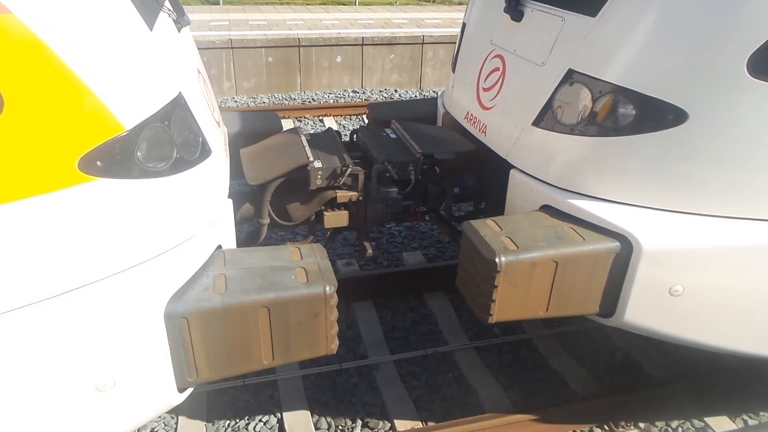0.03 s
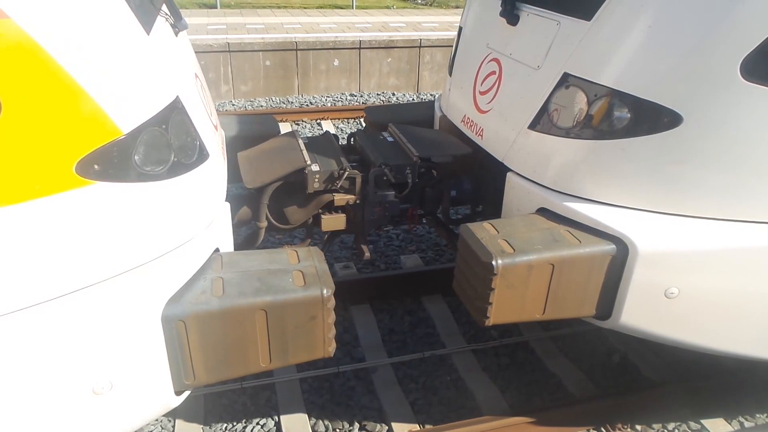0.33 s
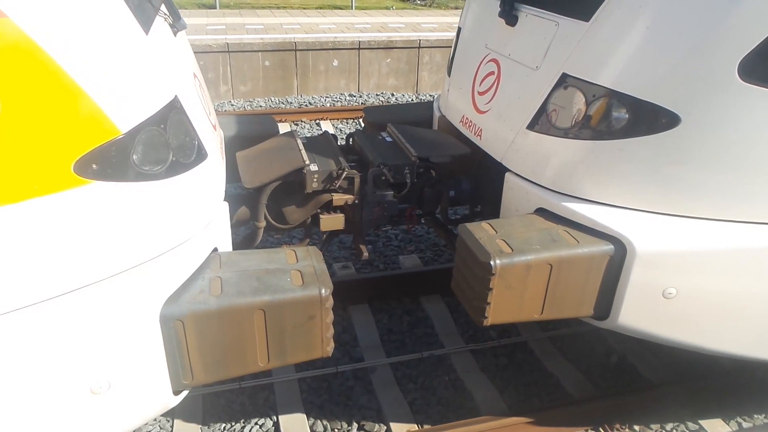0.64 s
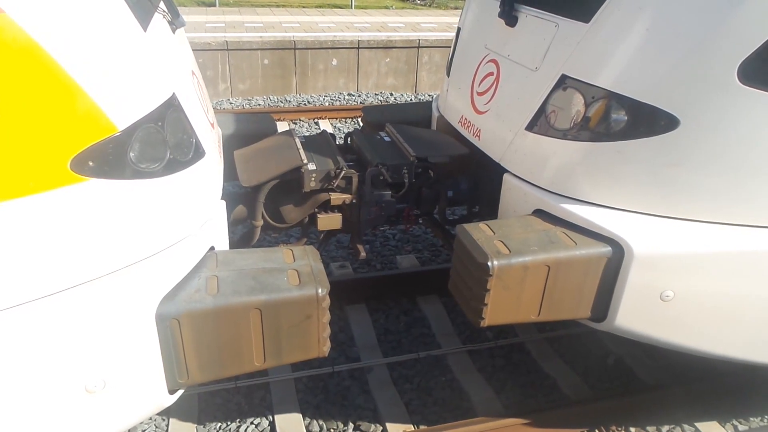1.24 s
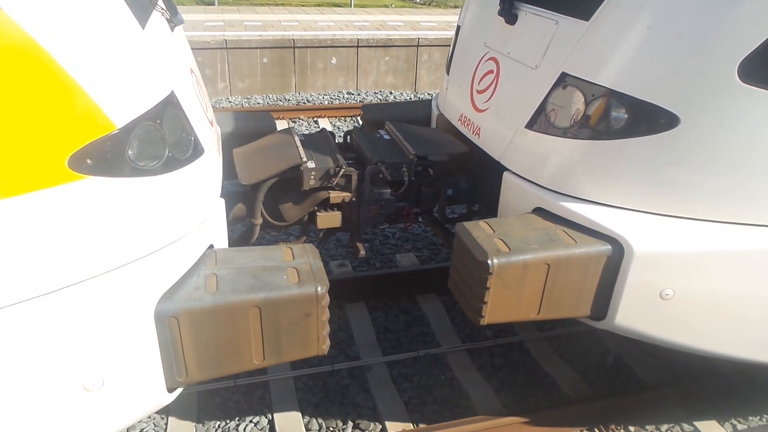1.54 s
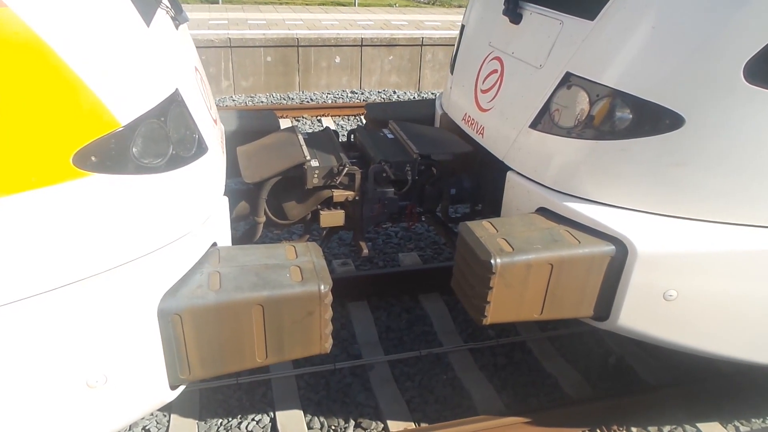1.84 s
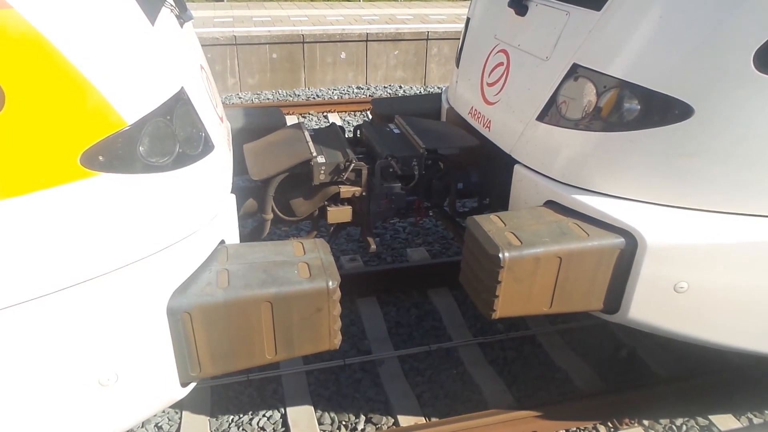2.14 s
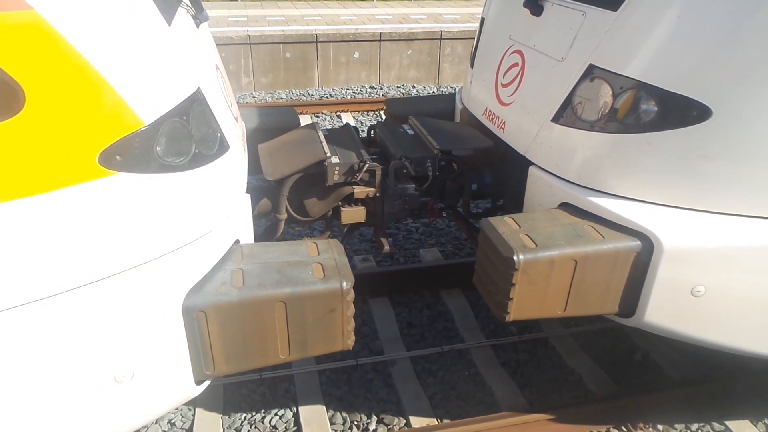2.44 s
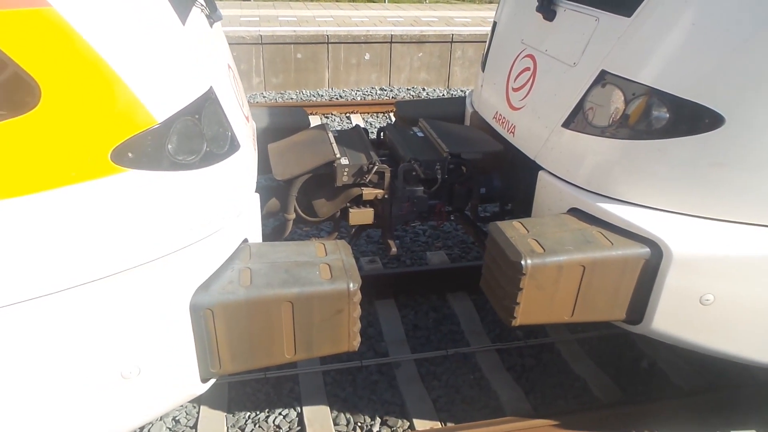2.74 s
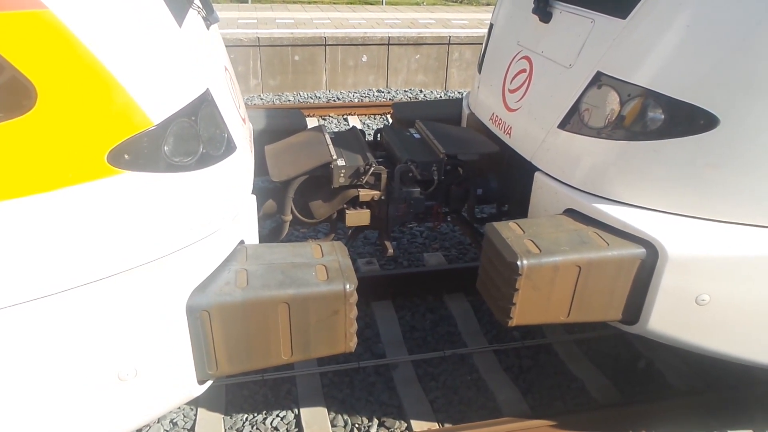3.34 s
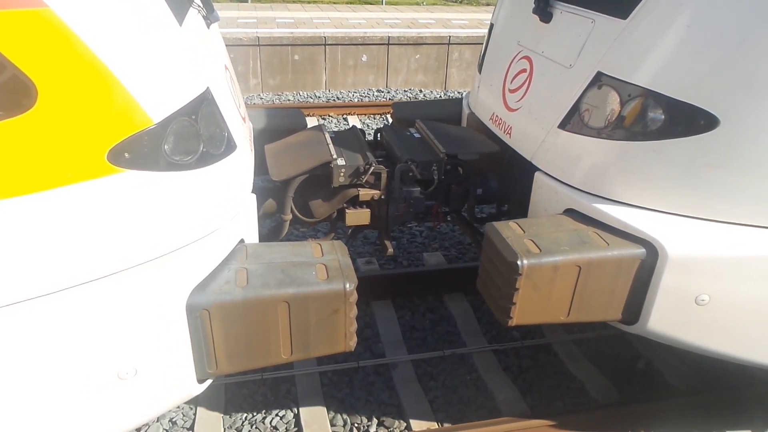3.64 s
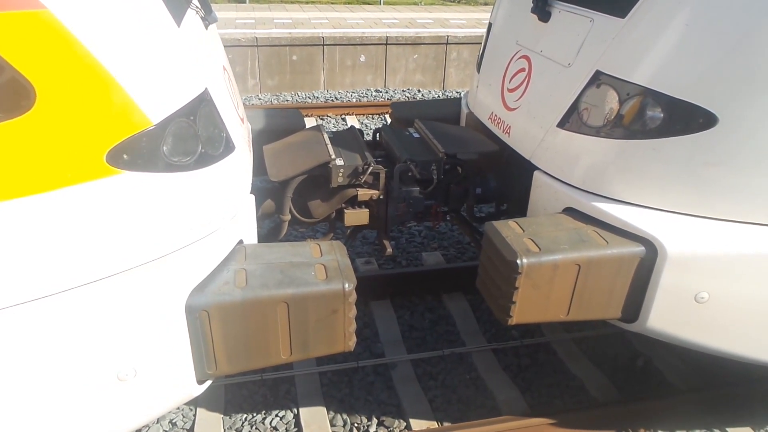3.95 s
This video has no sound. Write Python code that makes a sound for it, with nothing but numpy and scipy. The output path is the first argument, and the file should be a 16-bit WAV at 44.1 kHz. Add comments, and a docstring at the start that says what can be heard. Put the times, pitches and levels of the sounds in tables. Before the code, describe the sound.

Compressed air bursts from an idling train, hissing away before a brake starts to squeal.

```python
"""A railcar coupler vents: a sharp air blast, ringing between two cabs, dulls and dies as the pipe empties.
The pipe whistles briefly and the coupler shifts with a clunk. Behind it two diesel railcars stand nose
to nose at a platform: engines thud, fans roar, an inverter whines. Then metal ticks twice, one engine
picks up, the fan hiss swells and a brake begins to squeal."""
import sys
import numpy as np
from scipy import signal
from scipy.fft import rfft, irfft
from scipy.io import wavfile

SR = 44100
rng = np.random.default_rng(int(sys.argv[2]) if len(sys.argv) > 2 else 0)


def bounce(signal):
    """Save signal as a 16-bit WAV file at the path given by the first command-line argument."""
    frames = np.transpose(np.atleast_2d(signal))
    limited = np.clip(frames, -1, 1)
    pcm = np.round(limited * 32767).astype(np.int16)
    wavfile.write(sys.argv[1], SR, pcm)


N = 176400
T = np.arange(N) / SR
HZ = np.maximum(np.arange(N // 2 + 1) * SR / N, 1)
MIC_LAG_S = np.array([[0], [0.0003506]])   # left, right

# left-right coherence of machinery noise: freq_hz, coherence
AMBIENT_COHERENCE = [(150, 0.97), (300, 0.89), (450, 0.7), (750, 0.49), (1200, 0.7), (2400, 0.47),
                     (4000, 0.06), (5500, 0.35), (7500, 0)]
# left-right coherence of vent and ticks: freq_hz, coherence
VENT_COHERENCE = [(2000, 0.5), (5500, 0.63), (9000, 0.4), (15000, 0.1)]


def from_db(db):
    """Decibels to gain."""
    return 10 ** (np.asarray(db) / 20)


def unit_rms(x):
    """Scale to unit power."""
    return x / np.sqrt(np.mean(x ** 2) + 1e-20)


def in_time(rows):
    """Each value column of a time table at every sample."""
    time_s, *columns = np.transpose(rows)
    return [np.interp(T, time_s, column) for column in columns]


def at_hz(rows):
    """A frequency table at every bin."""
    hz, value = np.transpose(rows)
    return np.interp(np.log(HZ), np.log(hz), value)


def white():
    """Spectrum of fresh white noise."""
    return rfft(rng.standard_normal(N))


def drift(rate_hz):
    """Low-passed random wander, unit RMS."""
    return unit_rms(irfft(white() / (1 + (HZ / rate_hz) ** 2), N))


def pan(db):
    """Constant-power stereo gains; db is left minus right."""
    gains = from_db(np.atleast_1d(db) * np.array([[.5], [-.5]]))
    return gains / np.sqrt(np.mean(gains ** 2, axis=0))


def air_noise(gain, coherence, pan_db=0):
    """Unit-power stereo turbulence: a direct part, later on the right, plus a diffuse part."""
    share = np.clip(at_hz(coherence), 0, 1)
    direct = white() * np.exp(-2j * np.pi * HZ * MIC_LAG_S)
    diffuse = np.array([white(), white()])
    both = np.sqrt(share) * direct + np.sqrt(1 - share) * diffuse
    return unit_rms(irfft(both * gain * pan(pan_db), N))


def resonance(hz, width_hz):
    """Gain of a steep-sided resonance."""
    return 1 / (1 + ((HZ ** 2 - hz ** 2) / (HZ * width_hz) / 2) ** 2)


def mode_gain(modes, width_hz):
    """Narrow peaks and dips on a flat response."""
    return 1 + sum((from_db(db) - 1) / (1 + ((HZ - hz) / (width_hz / 2)) ** 2) for hz, db in modes)


def swell(peak_s, half_width_s):
    """Gaussian rise and fall."""
    return np.exp(-((T - peak_s) / half_width_s) ** 2)


def tone(hz, phase_turns=0):
    """Unit-power stereo sine, later on the right."""
    turns = np.cumsum(hz + 0 * T) / SR - hz * MIC_LAG_S
    return np.sqrt(2) * np.cos(2 * np.pi * (turns + phase_turns))


def cab_echoes(x, count=80, spread_s=0.032, echo_db=-8):
    """Short reflections off the cab fronts comb the sound; unit power out."""
    delay, polarity = rng.random((count, 2)).T
    taps = np.zeros(N)
    taps[(delay * spread_s * SR).astype(int) + 1] = np.sign(polarity - .5) / np.sqrt(count)
    return unit_rms(irfft(rfft(x) * (1 + from_db(echo_db) * rfft(taps)), N))


def machinery(roar_db=-39, flutter_db=0.38, hum_sway_db=1.5, hum_wander_turns=.12):
    """Turbulent roar of fans and exhaust, with wavering hums."""
    # roar spectrum: freq_hz, density_db
    spectrum = [(20, -30), (45, -35), (70, -1), (110, -8), (165, 1), (210, -5.5), (250, -4.5), (370, -2.5),
                (480, -6.5), (620, -3), (900, -8.5), (1400, -9.5), (2200, -15), (3500, -22.5), (6000, -42)]
    # machinery tones: pitch_hz, level_db
    hum_tones = [(313, -58), (368, -57.5), (392.5, -53.5), (460, -55), (539.3, -52), (564, -55),
                 (857, -57.5), (1157, -55)]
    level = from_db(roar_db + flutter_db * drift(8))
    roar = level * air_noise(from_db(at_hz(spectrum)), AMBIENT_COHERENCE, pan_db=-1.16)
    hums = sum(from_db(db + hum_sway_db * drift(2.5)) * tone(hz, hum_wander_turns * drift(6))
               for hz, db in hum_tones)
    return roar + hums


def cooling_fan(flutter_db=.5):
    """Cooling air hisses through a resonant grille and swells late."""
    # airflow spectrum: freq_hz, density_db
    spectrum = [(500, -48), (1500, -5), (2200, -0.5), (2800, -1.5), (3700, 3), (4500, 0), (5400, -8.5),
                (6500, -21.5), (9000, -25.5), (16000, -40)]
    # grille resonances: freq_hz, boost_db
    grille_modes = [(2030, 7.5), (2115, 10.5), (2436, 6.5), (2632, 9.5), (2688, 8.5), (3035, -0.5),
                    (3085, 5.5), (3780, -1.5)]
    # hiss envelope: time_s, level_db
    envelope = [(0, -45), (1.4, -47), (2.6, -48), (3.0, -46.5), (3.5, -42.5), (3.9, -44), (4, -44)]
    # stereo balance: freq_hz, pan_db
    balance = [(1000, -11), (2400, -2.5), (4300, -9), (6000, -6), (9000, 0)]
    level_db, = in_time(envelope)
    level = from_db(level_db + flutter_db * drift(11))
    colour = from_db(at_hz(spectrum)) * mode_gain(grille_modes, width_hz=13.6)
    return level * air_noise(colour, AMBIENT_COHERENCE, at_hz(balance))


def noise_floor(level_db=-56):
    """Thin steady hiss."""
    # hiss spectrum: freq_hz, density_db
    spectrum = [(1000, 4), (6000, 4), (8000, 0.5), (12000, -2), (16000, -2)]
    return from_db(level_db) * air_noise(from_db(at_hz(spectrum)), AMBIENT_COHERENCE, pan_db=-1.1)


def inverter(sway_db=1.1, pan_db=-20):
    """Switching whine; the sidebands make it buzz."""
    # carrier and sidebands: pitch_hz, level_db
    partials = [(3945.6, -63.5), (4000, -50.5), (4054.7, -57.5)]
    # whine envelope: time_s, gain_db
    envelope = [(0, -5), (1.0, -4.5), (2.0, -9), (2.8, 2.5), (3.4, 2), (4, 1)]
    gain_db, = in_time(envelope)
    whine = sum(from_db(db + sway_db * drift(2.4)) * tone(hz, rng.random()) for hz, db in partials)
    return from_db(gain_db) * whine * pan(pan_db)


def idling_engine(turn_hz=24.52, first_thud_s=.052, jitter_s=0.00018, base_db=-42.5, sway_db=1.0):
    """Phase-locked harmonics of the turning rate: one thud per turn."""
    # engine harmonics: order, relative_db
    orders = [(2, -36), (4, -10.5), (5, -1.5), (6, 1), (7, -6.5), (8, -1)]
    # thud strength: time_s, gain_db
    envelope = [(0, 0), (.6, 1.5), (1.3, 0), (2.4, 0), (2.65, 2.2), (2.95, 0.5), (3.4, -0.5), (4, 1)]
    delay_s = first_thud_s + jitter_s * drift(4.3)
    thuds = sum(from_db(db + sway_db * drift(4.9)) * tone(order * turn_hz, -order * turn_hz * delay_s)
                for order, db in orders)
    gain_db, = in_time(envelope)
    return from_db(base_db + gain_db) * unit_rms(thuds)


def revving_engine(throb_hz=1.67, throb_peak_s=.27, throb_depth=0.7, rumble_db=-45.5):
    """The second engine throbs, sags, then picks up; its exhaust rumbles under load."""
    # engine run: time_s, firing_hz, fundamental_db, octave_db
    run = [(0, 40.34, -75, -49), (.8, 39.93, -65, -50), (2.2, 40.3, -64, -50), (2.65, 39, -67, -49),
           (2.9, 39.4, -68, -58), (3.35, 45.3, -58, -65), (3.7, 46.6, -55, -65), (4, 48, -65, -69)]
    # exhaust spectrum: freq_hz, density_db
    spectrum = [(25, -22), (45, -19), (72, 3.5), (100, -11), (200, -8), (400, -16), (800, -7), (1500, -21),
                (4000, -54)]
    firing_hz, fundamental_db, octave_db = in_time(run)
    throb = 1 + throb_depth * np.cos(2 * np.pi * throb_hz * (T - throb_peak_s))
    fundamental = from_db(fundamental_db) * tone(firing_hz)
    octave = from_db(octave_db) * throb * tone(2 * firing_hz)
    load = from_db(rumble_db) * swell(peak_s=3.79, half_width_s=0.6)
    return fundamental + octave + load * air_noise(from_db(at_hz(spectrum)), AMBIENT_COHERENCE)


def brake_squeal(pitch_hz=4268, sag_start_s=3.81, sag_hz_per_s=200, rough_db=1):
    """Nearly pure friction tone that swells and sags in pitch."""
    # squeal envelope: time_s, level_db, pan_db
    envelope = [(3.72, -75, -12), (3.81, -49, -18), (3.848, -34.5, -26), (3.885, -30, -27),
                (3.956, -30.5, -14), (4, -29.5, -15)]
    # brake partials: ratio, gain_db
    partials = [(1, 2), (1.45, -32.5), (2, -39)]
    level_db, pan_db = in_time(envelope)
    hz = pitch_hz - sag_hz_per_s * np.maximum(T - sag_start_s, 0)
    ring = sum(from_db(db) * tone(ratio * hz) for ratio, db in partials)
    started = T > envelope[0][0]
    return started * from_db(level_db - rough_db * drift(60)) * ring * pan(pan_db)


def coupler_knocks(clunk_db=-38.5, tick_decay_s=0.0023):
    """The coupler shifts with a dull clunk; two light metal ticks follow."""
    # metal ticks: start_s, centre_hz, width_hz, level_db
    ticks = [(2.915, 4700, 2400, -37.5), (2.999, 8200, 1500, -52)]
    clunk = from_db(clunk_db) * swell(peak_s=1.7, half_width_s=0.028)
    out = clunk * air_noise(resonance(hz=350, width_hz=290), AMBIENT_COHERENCE)
    for start_s, hz, width_hz, db in ticks:
        decay = (T >= start_s) * np.exp(-np.abs(T - start_s) / tick_decay_s)
        out += from_db(db) * decay * air_noise(resonance(hz, width_hz) ** 2, VENT_COHERENCE, pan_db=-8)
    return out


def coupler_vent(open_s=1.515, attack_s=0.013, shut_s=2.517, release_s=.1, flutter_db=0.5):
    """The valve snaps open; pressure drains, treble first; the pipe whistles briefly and leaks on."""
    # body of the blast: freq_hz, density_db
    body = [(800, -17), (2100, -9.5), (2650, -3.5), (3500, 2), (4400, 4), (5400, -3.5), (6100, -19),
            (6900, -13), (9000, -17), (16000, -36)]
    # bright edge of the blast: freq_hz, density_db
    edge = [(2000, -20), (4000, -1), (6000, 6.5), (7200, 1), (8000, -4), (10000, -2), (13000, -6.5),
            (16000, -7)]
    # coupler bay resonances: freq_hz, boost_db
    bay_modes = [(2571, 11), (2700, -2), (3086, 5.5), (3284, 5), (3390, 6), (3535, 7), (3661, -1),
                 (3779, 9), (4697, 6.5), (4900, 5), (5358, 6.5), (5950, 1), (6480, -3)]
    # stereo balance: freq_hz, pan_db
    balance = [(2500, 0), (3500, -0.5), (4400, -6.5), (5500, -1), (8000, 3), (15000, 9)]
    # pipe whistles: peak_s, half_width_s, centre_hz, width_hz, level_db
    whistles = [(1.536, 0.013, 3430, 200, -40), (1.696, .02, 2010, 400, -41), (2.1, .17, 4940, 130, -54),
                (2.36, 0.1, 5350, 330, -50)]
    age_s = np.maximum(T - open_s, 0)
    body_db = -32.5 - 17 * age_s
    edge_db = -36 - 33 * age_s
    leak_db = -59.5 - 3 * age_s
    opening = np.minimum(age_s / attack_s, 1)
    closing = np.exp(-np.maximum(T - shut_s, 0) / release_s)
    flow = opening * closing * from_db(flutter_db * drift(25))
    bay = mode_gain(bay_modes, width_hz=42)
    pan_db = at_hz(balance)
    blast = 0
    for spectrum, level_db in (body, body_db), (edge, edge_db):
        jet = air_noise(from_db(at_hz(spectrum)) * bay, VENT_COHERENCE, pan_db)
        blast += from_db(level_db) * cab_echoes(jet)
    for peak_s, half_width_s, hz, width_hz, db in whistles:
        whistle = air_noise(resonance(hz, width_hz), VENT_COHERENCE, pan_db)
        blast += from_db(db) * swell(peak_s, half_width_s) * whistle
    leak = from_db(leak_db) * air_noise(from_db(at_hz(edge)), VENT_COHERENCE, pan_db=2)
    return flow * blast + opening * leak


def scene():
    """Everything heard from the platform edge."""
    engines = idling_engine() + revving_engine()
    background = machinery() + cooling_fan() + noise_floor() + inverter()
    return engines + background + coupler_vent() + coupler_knocks() + brake_squeal()


def record(dry, start_s=.036, fade_s=.002, cutoff_hz=15800):
    """Quick fades in and out, then a steep low-pass."""
    gate = np.clip(np.minimum(T - start_s, T[-1] - T) / fade_s, 0, 1)
    lowpass = signal.ellip(12, .1, 80, cutoff_hz, fs=SR, output="sos")
    return signal.sosfilt(lowpass, dry * gate)


dry = scene()
out = record(dry)
bounce(out)
```